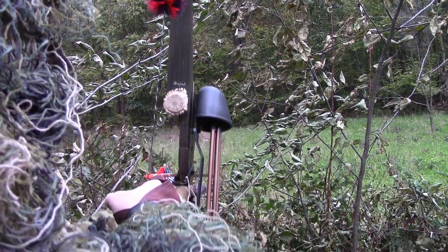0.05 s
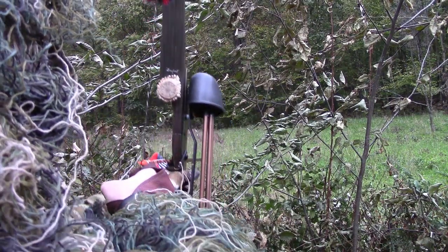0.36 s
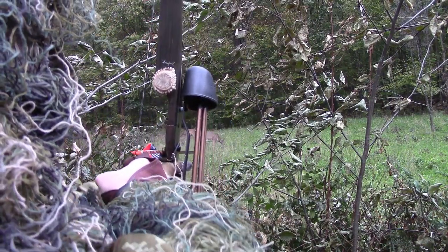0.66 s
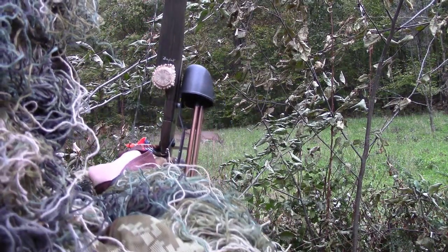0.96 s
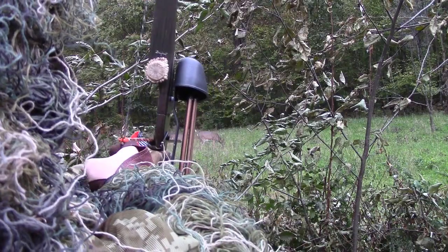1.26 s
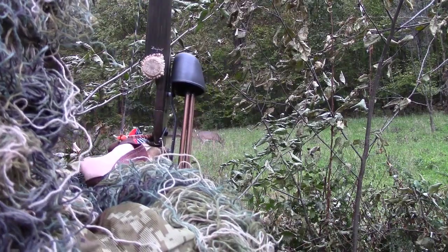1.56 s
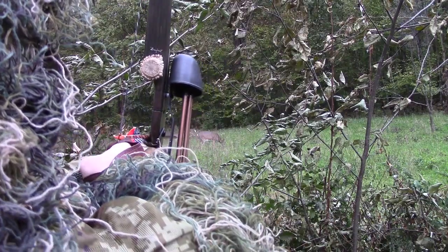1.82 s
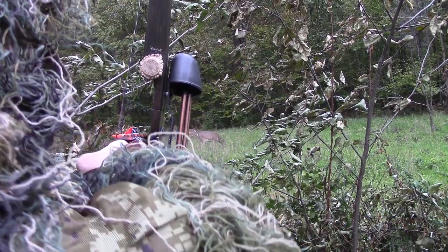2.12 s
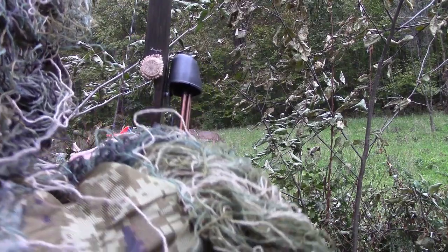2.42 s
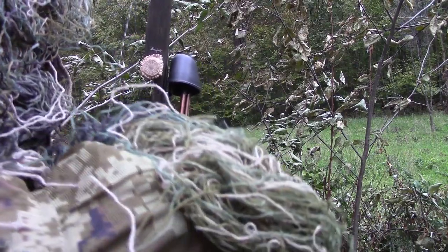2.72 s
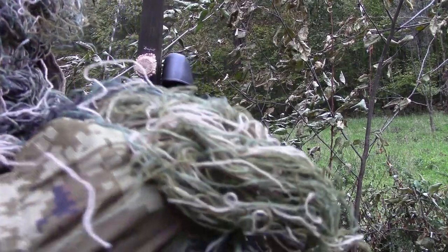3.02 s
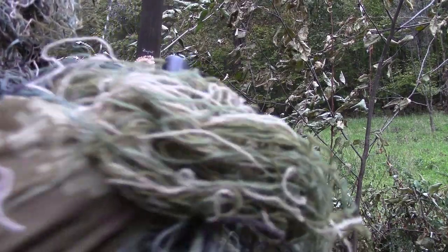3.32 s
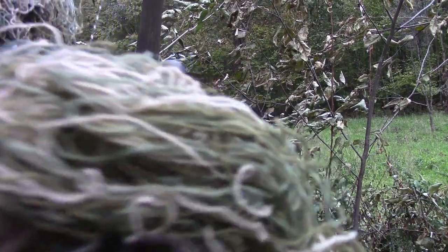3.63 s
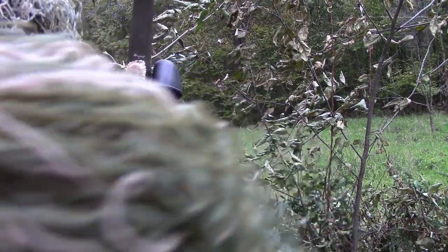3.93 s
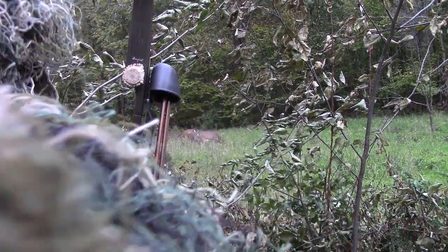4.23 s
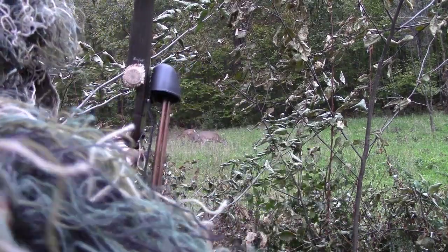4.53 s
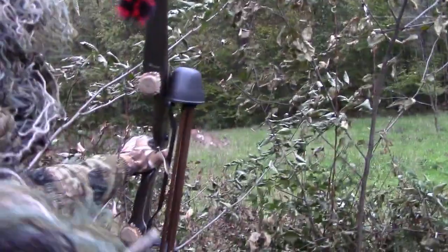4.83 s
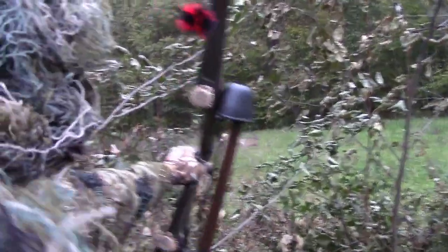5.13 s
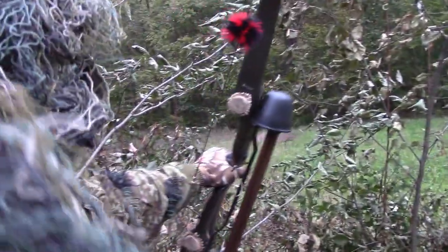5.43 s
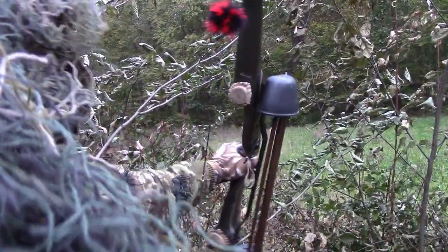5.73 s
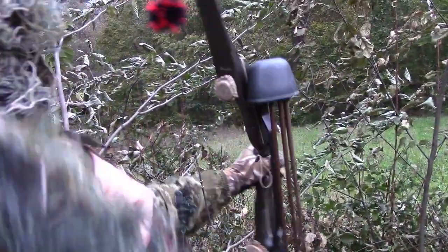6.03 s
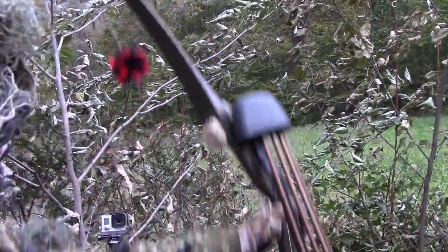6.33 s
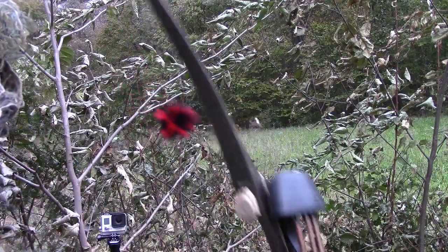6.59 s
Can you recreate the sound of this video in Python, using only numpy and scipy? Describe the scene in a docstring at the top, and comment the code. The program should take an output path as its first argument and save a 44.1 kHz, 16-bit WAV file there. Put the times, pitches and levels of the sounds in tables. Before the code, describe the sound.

At the brushy edge of a field, faint bird peeps and cricket trills sit over a soft hush. A sleeve slides and gear ticks quietly as a bow is drawn. The bow fires right beside the microphone with one loud, rattling snap and a low thump, echoing briefly in the brush. Afterwards the archer's shaggy suit rustles in a few soft strokes, with small clicks of twigs and gear.

```python
"""A recurve bow is shot beside a camera at the brushy edge of a field.
The arrow scrapes off its rest, the string slaps the bow's limbs five times and chatters out, and brush
and trees echo the shot. The jolt sets the microphone swaying. The archer's shaggy suit ticks during the
draw, then rustles in a few strokes as the bow comes down. Faint birds and crickets call over a soft hush."""
import sys
import numpy as np
from scipy import signal
from scipy.fft import rfft, irfft, next_fast_len
from scipy.io import wavfile
from scipy.ndimage import map_coordinates

SR = 44100
rng = np.random.default_rng(int(sys.argv[2]) if len(sys.argv) > 2 else 0)


def master(y):
    """Save y as 16-bit WAV."""
    cut = np.clip(np.atleast_2d(y).T, -1, 1)
    pcm = np.round(cut * 32767)  # scale
    wavfile.write(sys.argv[1], SR, pcm.astype(np.int16))


N = 293706

# Levels in the tables are relative: each layer is turned up or down as it is mixed.
# ringing notes of the limbs, handle and quiver, then of the launch: pitch_hz, level_db, fade_s
BOW_NOTES = [(170.5, 7.5, 0.083), (249, -5, 0.09), (300, -1.5, 0.099), (338.4, 2, 0.082), (452, -8, 0.084),
             (517, 0, 0.11), (740, -12, 0.086), (855, -10, 0.12), (897, -4.5, 0.074), (970, -6, 0.052),
             (1041, -3.5, 0.072), (1133, -8, 0.058), (1175, -1, 0.067), (1265, -1, 0.077),
             (1452, -1, 0.075), (1964, -8, 0.037), (2110, -16, 0.08), (2500, -14, .06), (2520, -13, 0.055),
             (3150, -15, 0.057), (3510, -12, 0.1)]
LAUNCH_NOTES = [(74, -24, .3), (493, -5, .062), (588, -5, .058), (1150, -16, .05), (1650, -18, .04),
                (1960, -14, .04)]
# the string slapping the limbs: start_s, knock_db, rattle_db, rattle_hz, rattle_fade_s, snap_db, ring_db
STRING_SLAPS = [(4.5898, -13, -7.5, 1950, .046, -18.5, -33), (4.6033, -7.5, -11.5, 1510, 0.033, -8.5, -21),
                (4.616, -5.5, -12.5, 1100, 0.033, -14, -21.5), (4.6281, -10, -3, 2300, .016, -22, -21),
                (4.6408, -5.5, -12.5, 1200, .027, -26, -29)]
# tone of the three noises in a hit: pitch_hz, level_db
KNOCK_TONE = [(20, -34), (90, -13), (170, 6), (400, -1.5), (750, 0), (1250, -2), (2500, -16), (5000, -29),
              (15000, -45)]
RATTLE_TONE = [(100, 0), (400, 0.5), (800, -6), (1300, -2.5), (2000, -4.5), (2900, -6), (3700, -11.5),
               (5800, -17), (8000, -21.5), (15000, -42)]
SNAP_TONE = [(800, -24), (3000, 3.5), (6000, 4), (8500, -6), (11000, -4.5), (13500, -14), (15500, -21)]
# tone of the echoes from the brush and the trees: pitch_hz, level_db
BRUSH_TONE = [(80, -22), (200, -1.5), (850, 5), (1300, -19), (3000, -3.5), (7000, 9), (15000, 13)]
TREES_TONE = [(100, -4), (800, -1.5), (1500, 3.5), (2600, -1.5), (12000, 10)]
# how long those echoes last: pitch_hz, fade_s
BRUSH_FADE = [(100, 0.33), (600, 0.25), (2000, 0.25), (12000, 0.26)]
TREES_FADE = [(100, 0.47), (1500, 1.97), (5000, 1.6), (12000, 0.76)]
# swings of the microphone mount: start_s, pitch_hz, sway_db, rock_db, rise_s, fade_s
MOUNT_JOLTS = [(4.628, 39.6, -8, -9, 0.024, 0.16), (4.689, 26.6, -0.5, 2, 0.04, 0.31),
               (4.767, 21.8, -6.5, -10.5, 0.059, 0.71), (5.65, 27.7, -13.5, -8.5, 0.046, 0.3),
               (5.76, 21.8, -31.5, -23, 0.056, 0.72)]
# puffs of air on the microphone: peak_s, rise_s, fall_s, level_db
AIR_PUFFS = [(.85, .25, .3, -68), (4.70, 0.045, .045, -30), (5.16, .14, 0.14, -48.5),
             (5.58, .1, .15, -48.5)]
# tone of those puffs: pitch_hz, level_db
PUFF_TONE = [(10, -20), (20, -0.5), (45, -3.5), (80, -8), (130, -16), (250, -33.5), (600, -65)]
# the sleeve sliding during the draw: peak_s, rise_s, fall_s, level_db
SLEEVE_SLIDES = [(3.79, .11, .075, -57), (3.975, .035, .02, -58.5)]
# rustles as the bow comes down: peak_s, rise_s, fall_s, level_db, cloth_over_strands_db
SUIT_STROKES = [(5.264, .033, .04, -49.5, -1), (5.54, .06, .045, -50, -5), (5.872, .08, .055, -46, -11),
                (6.191, .075, .07, -50, -12), (6.48, .03, .015, -52, -20), (6.55, .02, .035, -49, -11)]
# tone of each part of the suit: pitch_hz, level_db
STRAND_TONE = [(300, -12), (700, -4), (1500, -1.5), (2000, -0.5), (2600, 1), (3500, 0), (5500, -4.5),
               (7000, -17.5), (10000, -22), (15000, -40)]
CLOTH_TONE = [(2000, -25), (4500, -2), (6500, 0.5), (9000, -4.5), (12000, -12), (15500, -27)]
FOLD_TONE = [(80, -12.5), (180, 2), (380, 0), (600, -9), (1200, -34)]
SLEEVE_TONE = [(200, -12), (700, -1), (1600, -2), (2600, -10), (4500, -4.5), (7000, -16), (15000, -26)]
# twigs and gear ticking: start_s, crackle_db, crackle_hz, fade_s, knock_db, knock_hz
GEAR_TICKS = [(3.633, -47, 3500, 0.027, -56, 900), (3.7775, -44, 2600, .018, -45, 1000),
              (3.839, -48, 1400, .014, -47, 1100), (3.9911, -37.5, 2000, .007, -35, 650),
              (5.0053, -30, 6560, 0.009, -44, 900), (5.0139, -32.5, 3760, .011, -54, 500),
              (5.018, -37.5, 1800, 0.038, -28.5, 286), (5.517, -31, 4400, 0.033, -35, 354),
              (5.5723, -41, 4500, 0.028, -57, 400), (5.848, -41, 3200, .027, -33, 700),
              (6.133, -42, 5500, .021, -58, 400), (6.312, -48, 1500, 0.033, -32.5, 550),
              (6.5846, -29, 1780, 0.009, -32.5, 350), (6.5918, -32, 4360, 0.015, -44, 400)]
# distant bird peeps: start_s, pitch_hz, level_db
BIRD_PEEPS = [(.22, 5550, -63), (.42, 4000, -58), (.98, 6300, -60), (1.08, 5620, -57), (1.53, 5550, -61),
              (2.42, 5450, -57), (2.78, 5750, -62), (3.013, 5150, -60), (4.40, 7200, -62)]
# cricket trills: start_s, length_s, pitch_hz, level_db
CRICKET_TRILLS = [(0, .68, 3380, -65), (1.05, .75, 3680, -64), (1.83, .25, 3760, -64),
                  (3.25, .35, 3700, -67), (3.7, .6, 3740, -73), (4.3, .25, 3560, -70)]
# tone of the field's hush and low rumble: pitch_hz, level_db
HUSH_TONE = [(12, -34), (20, 0.5), (55, -10), (93, -4.5), (123, -10), (187, -9.5), (355, -10.5),
             (408, -12.5), (693, -13.5), (1110, -18), (3130, -23.5), (3700, -22.5), (4760, -24.5),
             (13400, -34.5), (15800, -47)]
RUMBLE_TONE = [(10, -28), (22, 1), (55, -8.5), (95, -0.5), (140, -10), (300, -25)]
# how alike left and right sound (1 is the same, 0 is unrelated): pitch_hz, likeness
BOW_LIKENESS = [(100, 0.91), (1400, 0.99), (3500, 0.76), (7000, 0.82), (15000, 0.41)]
SUIT_LIKENESS = [(200, 1), (700, 0.81), (3000, 1), (8000, 0.71), (15000, 0.66)]
AIR_LIKENESS = [(60, 0.72), (130, 0.55), (290, 0.39), (640, 0.11), (1410, 0.13), (3100, 0.08),
                (6820, 0.016), (15000, -0.11)]
# which side is louder: pitch_hz, left_over_right_db
BOW_BALANCE = [(100, 4.6), (400, 2.7), (1300, 1.5), (8000, 0.5)]
SUIT_BALANCE = [(200, -1.2), (4000, -1.6), (15000, -0.56)]

TOUCH_HZ, TOUCH_FADE_S, TOUCH_RING_DB = 950, .036, -17  # a light hit: its rattle, and ring over rattle


def bow(slip_s=4.584, release_s=4.5858, bounce_s=.0065, chatter_s=4.650, swing_s=.0132):
    """The string drives the arrow off, slaps the limbs, then taps them more lightly with each swing."""
    out = np.zeros((2, N))
    add(out, slip_s, touch(-30))  # the string slips off the fingers
    launch = amp(-3) * ring(LAUNCH_NOTES, attack_s=0.0015, spread_db=1)
    arrow_scrape = touch(-15)
    add(out, release_s, launch + arrow_scrape)
    for k, (start, *slap) in enumerate(STRING_SLAPS):
        add(out, start, hit(*slap))
        add(out, start + bounce_s, touch(-14 - 2 * k))  # the string bounces back and taps again
    for k in range(5):
        db = -24.5 - 8 * np.log2(k + 1)
        tap = hit(db + 5, db, TOUCH_HZ, TOUCH_FADE_S, snap_db=-39, ring_db=db + TOUCH_RING_DB)
        add(out, chatter_s + k * swing_s, tap)
    return from_left(out, lead_s=5.3e-5, balance=BOW_BALANCE)


def hit(knock_db, rattle_db, rattle_hz, rattle_fade_s, snap_db, ring_db):
    """One hit on the bow makes a knock, rattling arrows, a bright snap and ringing limbs."""
    out, t = np.zeros((2, SR // 2)), clock(8192)
    # each spot on the bow favours its own range of pitches
    boost = lambda hz: amp(5 * np.exp(-(np.log2((hz + 1) / rattle_hz) / 0.26) ** 2))
    rattle = unit(filtered(noise(RATTLE_TONE, BOW_LIKENESS, len(t)), boost)) * fade(t, rattle_fade_s)
    snap = noise(SNAP_TONE, BOW_LIKENESS, len(t)) * fade(t, 0.015)
    onset = 1 - np.exp(-t / 0.00025)
    add(out, 0, (amp(rattle_db) * rattle + amp(snap_db) * snap) * onset)
    add(out, 0, amp(knock_db) * pulse(KNOCK_TONE))
    add(out, 0, amp(ring_db) * ring(BOW_NOTES, attack_s=.001, spread_db=1.5))
    return out


def touch(db):
    """A light, dull hit from the string or an arrow."""
    return hit(db - 4, db, TOUCH_HZ, TOUCH_FADE_S, snap_db=db - 15, ring_db=db + TOUCH_RING_DB)


def ring(notes, attack_s, spread_db):
    """A struck part rings with fading notes, a little louder or softer each time."""
    t = clock(SR // 2)
    tones = sum(amp(db + spread_db * rng.standard_normal()) * fade(t, fade_s) * np.sin(2 * np.pi * hz * t)
                for hz, db, fade_s in notes)
    return tones * (1 - np.exp(-t / attack_s))


def with_field_echoes(direct):
    """The sound itself, a quick echo from the brush and a faint, late one from the trees."""
    near = filtered(echo(direct, BRUSH_FADE, rise_s=0.0096), lambda hz: amp(look_up(BRUSH_TONE, hz)))
    far = filtered(echo(direct, TREES_FADE, rise_s=0.11), lambda hz: amp(look_up(TREES_TONE, hz)))
    return direct + amp(-16) * near + amp(-36) * far


def mount_swings():
    """Jolts swing the microphone: swaying moves both sides together, rocking moves them opposite ways."""
    out, t = np.zeros((2, N)), clock(SR)
    for start, hz, sway_db, rock_db, rise_s, fade_s in MOUNT_JOLTS:
        swing = fade(t, fade_s) * (1 - np.exp(-(t / rise_s) ** 2))
        sway = amp(sway_db) * np.sin(2 * np.pi * hz * t)
        rock = amp(rock_db) * np.cos(2 * np.pi * hz * t)
        add(out, start, swing * np.array([sway + rock, sway - rock]))
    return out * amp([[-1.5], [1.5]])


def air_puffs():
    """Puffs of air rumble on the microphone."""
    return amp(7) * swells(AIR_PUFFS) * noise(PUFF_TONE, likeness=[(60, 0.1)])


def archer():
    """The moving archer's suit rustles while twigs, gear and strands tick."""
    strands, cloth, sleeve = suit_motion()
    sound = suit_rustle(strands, cloth, sleeve) + gear_ticks() + strand_ticks(strands + sleeve)
    return from_left(sound, lead_s=4.7e-5, balance=SUIT_BALANCE)


def suit_motion(stir_s=4.72, rise_s=0.16, growth_db_per_s=2.5):
    """How loud strands, cloth and sleeve are over time; after the shot the suit stirs more and more."""
    since = clock() - stir_s
    stir = amp(-58.5 + growth_db_per_s * since) * np.clip(since / rise_s, 0, 1)
    strands = swells([(s, rise, fall, db) for s, rise, fall, db, _ in SUIT_STROKES])
    cloth = swells([(s, rise, fall, db + cloth_db) for s, rise, fall, db, cloth_db in SUIT_STROKES])
    return np.hypot(strands, stir), np.hypot(cloth, amp(-7) * stir), swells(SLEEVE_SLIDES)


def suit_rustle(strands, cloth, sleeve):
    """Strands catch in tiny snags, cloth and sleeve slide, and folds flap softly."""
    flicker = lambda depth_db, rate_hz: amp(depth_db * wobble(rate_hz))
    snags = flicker(3.8, 900)
    out = amp(1) * strands * noise(STRAND_TONE, SUIT_LIKENESS, grain=snags)
    out += amp(5) * cloth * noise(CLOTH_TONE, SUIT_LIKENESS, grain=flicker(1.5, 1500))
    out += amp(-3.5) * strands * noise(FOLD_TONE, SUIT_LIKENESS)
    out += amp(2) * sleeve * noise(SLEEVE_TONE, SUIT_LIKENESS, grain=snags)
    return out * flicker(1.5, 60)


def gear_ticks(knock_cycles=7):
    """Twigs and gear tick: a short crackle over a dull knock that dies quickly."""
    out, t = np.zeros((2, N)), clock(4096)
    for start, db, hz, fade_s, knock_db, knock_hz in GEAR_TICKS:
        knock = np.sin(2 * np.pi * knock_hz * t) * fade(t, knock_cycles / knock_hz)
        add(out, start, amp(db) * crackle(hz, fade_s) + amp(knock_db) * knock)
    return out


def strand_ticks(motion, count=30, pitch_hz=3620, spread_octaves=.4):
    """Strands snap free at random, more often and louder the more the suit moves."""
    out, travel = np.zeros((2, N)), np.cumsum(motion)
    moments = np.searchsorted(travel, rng.random(count) * travel[-1])
    for i, (strength, shift) in zip(moments, rng.standard_normal((count, 2))):
        tick = crackle(pitch_hz * 2 ** (spread_octaves * shift), fade_s=0.017)
        add(out, i / SR, motion[i] * amp(3.5 + 4 * strength) * tick)
    return out


def crackle(hz, fade_s):
    """A sharp pop and a short burst of noise around one pitch."""
    t = clock(4096)
    tone = [(hz / 8, -22), (hz / 4, -11), (hz, 0), (hz * 1.47, -4), (hz * 2, -15.4), (hz * 4, -33)]
    return noise(tone, SUIT_LIKENESS, len(t)) * fade(t, fade_s) + pulse(tone)


def birds(peep_s=.045, fall_hz=220):
    """Thin peeps that each slide down in pitch."""
    out, progress = np.zeros((2, N)), np.linspace(0, 1, int(peep_s * SR))
    for start, hz, db in BIRD_PEEPS:
        pitch = hz - fall_hz * progress + 80 * wobble(340)[:len(progress)]
        add(out, start, amp(db) * np.sin(np.pi * progress) * whistle(pitch))
    return out


def crickets():
    """High, wavering trills that fade in and out."""
    out = np.zeros((2, N))
    for start, length_s, hz, db in CRICKET_TRILLS:
        count = int(length_s * SR)
        pitch = hz + 65 * wobble(220)[:count]
        add(out, start, amp(db) * signal.windows.tukey(count) * whistle(pitch))
    return out


def through_leaves(calls):
    """Leaves on the way soften and blur the calls."""
    return amp(-4.5) * calls + amp(-6.5) * echo(calls, BRUSH_FADE, rise_s=0.0043)


def field_air():
    """The steady hush of the field over an uneven low rumble."""
    rumble = noise(RUMBLE_TONE, AIR_LIKENESS) * amp(-64 + 2.3 * wobble(4.96))
    hush = noise(HUSH_TONE, AIR_LIKENESS) * amp([[-52.6], [-52.1]])
    return hush + rumble


def amp(db):
    """Turn decibels into a number to multiply by."""
    return 10 ** (np.asarray(db) / 20)


def unit(x):
    """Scale a sound to an average power of 1."""
    return x / np.sqrt(np.mean(x ** 2) + 1e-20)


def look_up(table, hz):
    """Read a table at any pitch, gliding between its rows."""
    pitches, values = np.transpose(table)
    return np.interp(np.log(hz + 1), np.log(pitches + 1), values)


def clock(count=N):
    """The time in seconds at each sample."""
    return np.arange(count) / SR


def wobble(rate_hz):
    """A smooth curve through rate_hz random points a second."""
    return map_coordinates(rng.standard_normal(int(N * rate_hz / SR) + 4), [clock() * rate_hz])


def fade(t, fade_s):
    """Die away by 60 dB every fade_s seconds."""
    return amp(-60 * t / fade_s)


def whistle(pitch_hz):
    """A pure tone that follows a changing pitch."""
    return np.sin(2 * np.pi * np.cumsum(pitch_hz) / SR)


def swells(rows):
    """A loudness curve made of bell-shaped humps."""
    t = clock()
    return np.sqrt(sum(amp(db) ** 2 * np.exp(-((t - peak) / np.where(t < peak, rise, fall)) ** 2)
                       for peak, rise, fall, db in rows))


def add(track, start_s, sound):
    """Mix a sound into a track at the given time."""
    part = track[..., max(round(start_s * SR), 0):][..., :sound.shape[-1]]
    part += sound[..., :part.shape[-1]]


def filtered(x, response):
    """Multiply each pitch in a sound by response(hz)."""
    count = x.shape[-1]
    padded = next_fast_len(count + 4096)
    return irfft(rfft(x, padded) * response(np.fft.rfftfreq(padded, 1 / SR)), padded)[..., :count]


def noise(tone, likeness, count=N, grain=1):
    """Stereo noise with the given tone; grain roughens it first."""
    angle = lambda hz: np.arccos(np.clip(look_up(likeness, hz), -1, 1)) / 2
    shape = lambda hz: amp(look_up(tone, hz)) * [np.cos(angle(hz)), np.sin(angle(hz))]
    shared, opposite = filtered(grain * rng.standard_normal((2, count)), shape)
    return unit(np.array([shared + opposite, shared - opposite]))


def pulse(tone, size=4096):
    """One sudden push with the given tone and a peak of 1."""
    cepstrum = irfft(np.log(amp(look_up(tone, np.fft.rfftfreq(size, 1 / SR)))))
    # folding the late half onto the early half packs the energy at the start
    cepstrum[1:size // 2] *= 2
    cepstrum[size // 2 + 1:] = 0
    push = irfft(np.exp(rfft(cepstrum)))
    return push / np.abs(push).max()


def from_left(x, lead_s, balance):
    """Sound from the archer's side reaches the left of the microphone first."""
    half = np.array([[.5], [-.5]])
    head_start = lambda hz: np.exp(2j * np.pi * hz * lead_s * half)
    return filtered(x, lambda hz: head_start(hz) * amp(look_up(balance, hz) * half))


def echo(x, fades, rise_s):
    """A blurred echo in which each pitch dies away at its own speed."""
    hz, t, bands = signal.stft(rng.standard_normal((2, SR)), SR, nperseg=256)
    tail = signal.istft(bands * fade(t, look_up(fades, hz)[:, None]), SR, nperseg=256)[1]
    tail *= 1 - np.exp(-(clock(tail.shape[1]) / rise_s) ** 2)
    return signal.fftconvolve(x.mean(0)[None], tail / np.linalg.norm(tail[0]), axes=1)[:, :N]


def scene():
    """Everything that reaches the microphone, left and right."""
    foreground = with_field_echoes(bow()) + mount_swings() + air_puffs() + archer()
    return foreground + through_leaves(birds() + crickets()) + field_air()


def record(dry, ceiling=0.99, top_hz=15850):
    """The camera rounds off the loudest peaks and drops the very highest pitches."""
    rounded = dry / (1 + np.abs(dry / ceiling) ** 6) ** (1 / 6)
    return filtered(rounded, lambda hz: hz < top_hz)


dry = scene()
out = record(dry)
master(out)
```